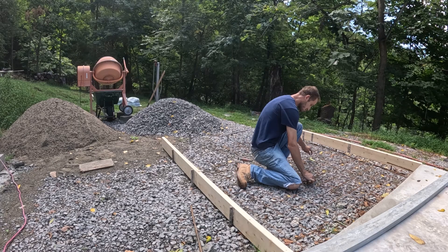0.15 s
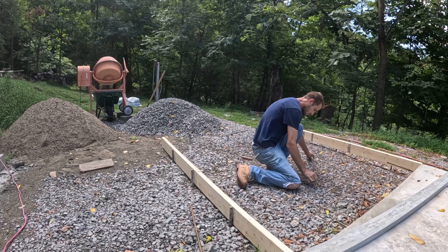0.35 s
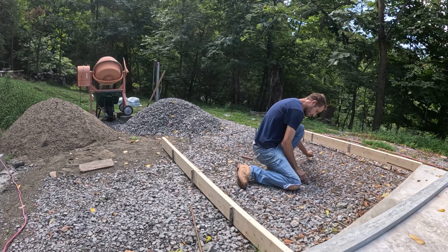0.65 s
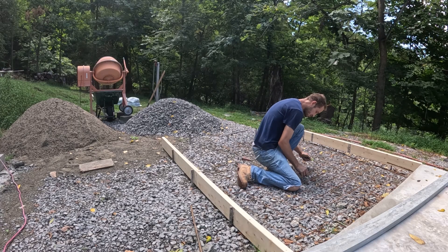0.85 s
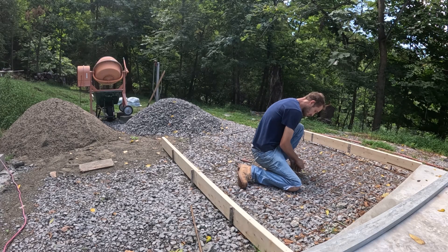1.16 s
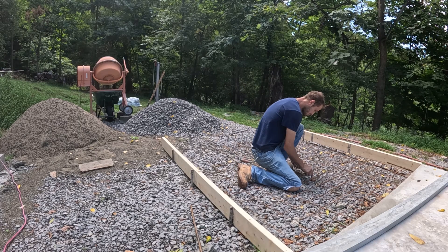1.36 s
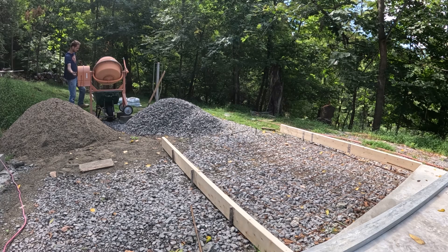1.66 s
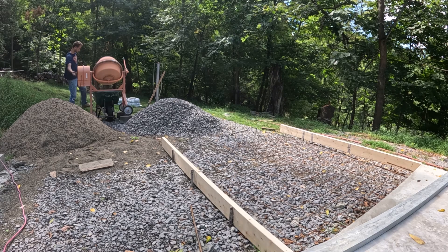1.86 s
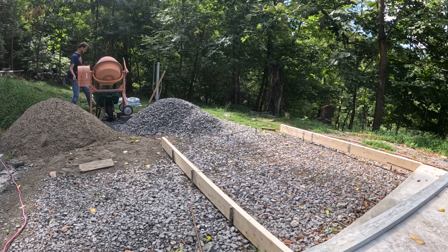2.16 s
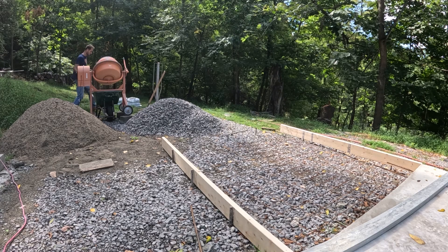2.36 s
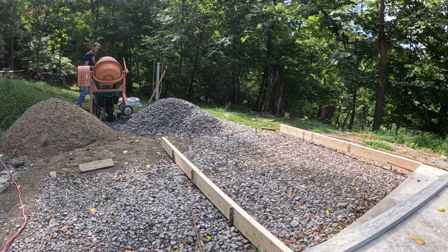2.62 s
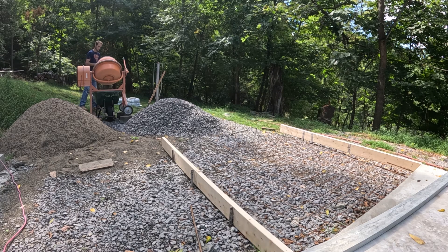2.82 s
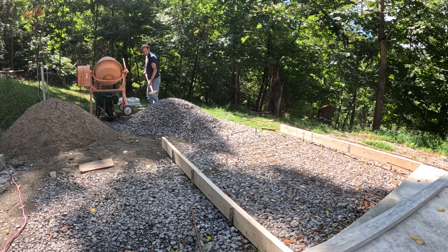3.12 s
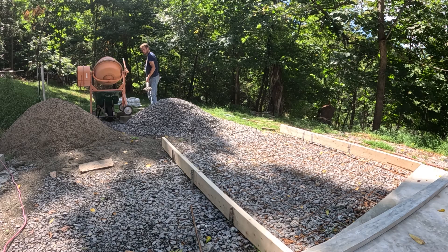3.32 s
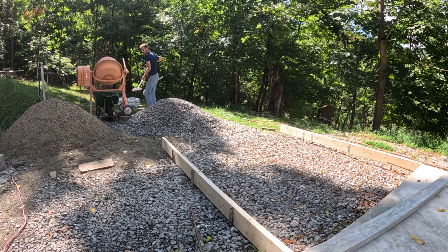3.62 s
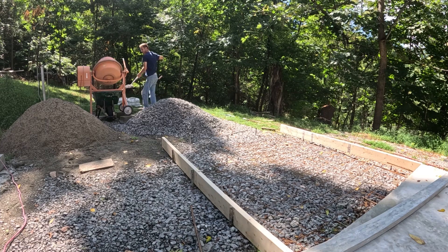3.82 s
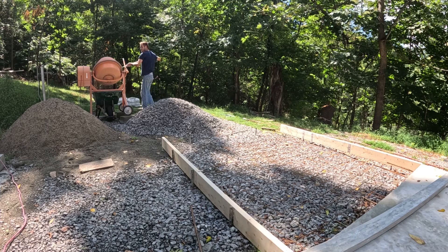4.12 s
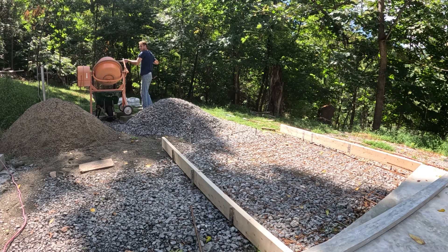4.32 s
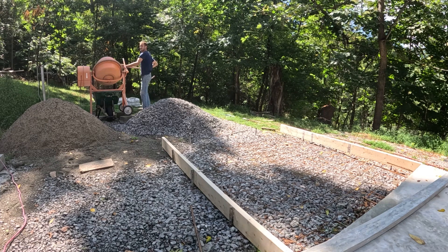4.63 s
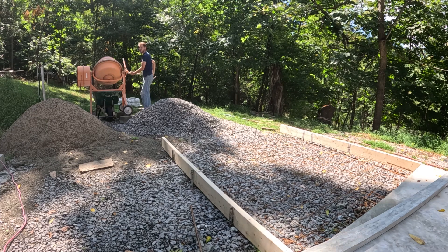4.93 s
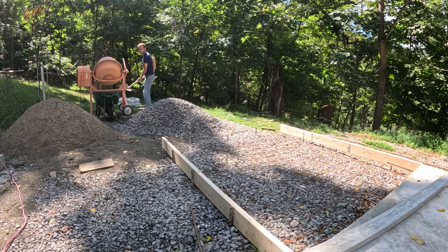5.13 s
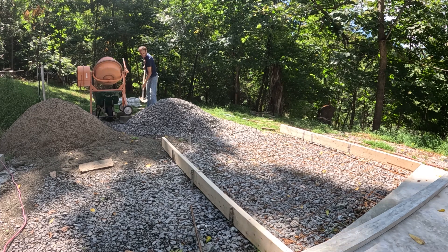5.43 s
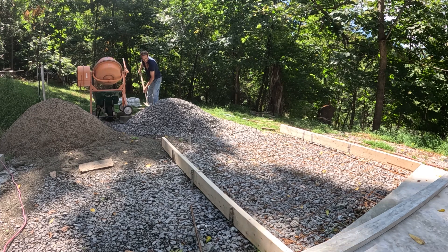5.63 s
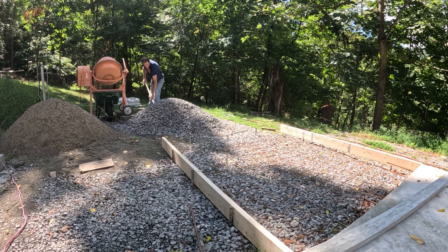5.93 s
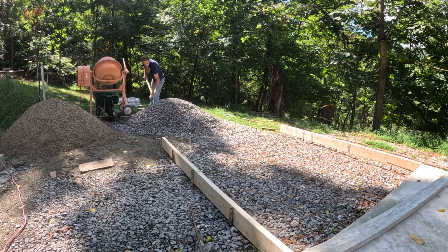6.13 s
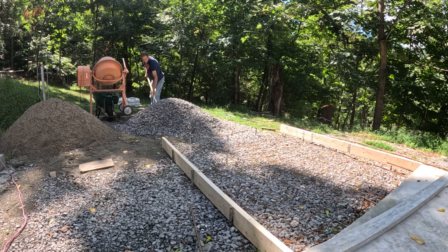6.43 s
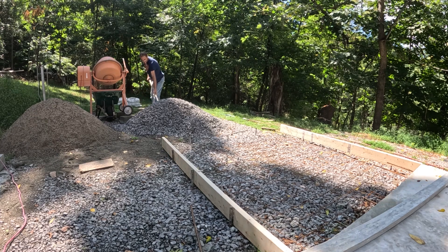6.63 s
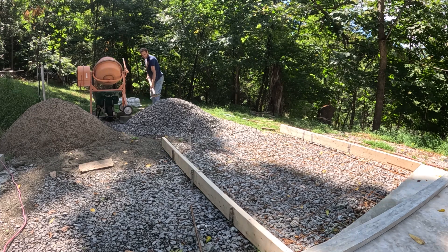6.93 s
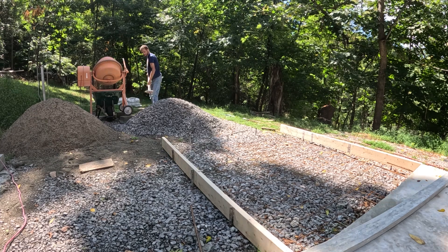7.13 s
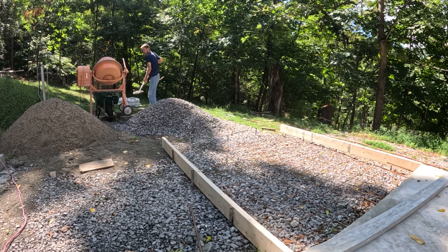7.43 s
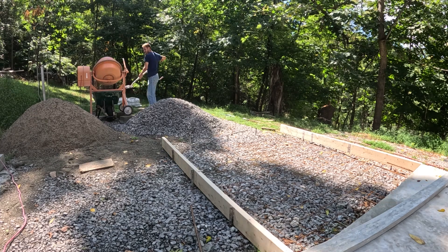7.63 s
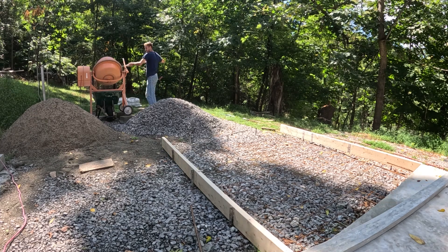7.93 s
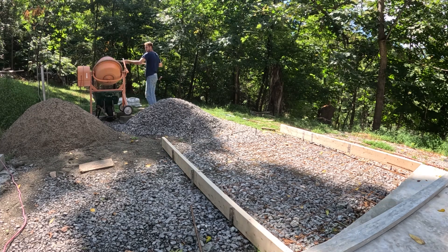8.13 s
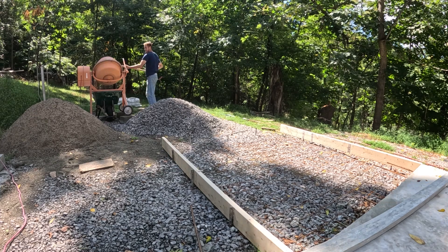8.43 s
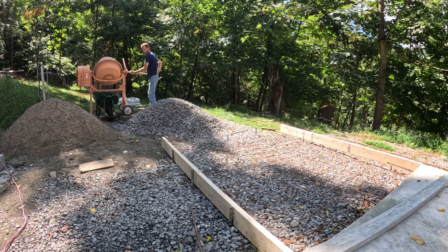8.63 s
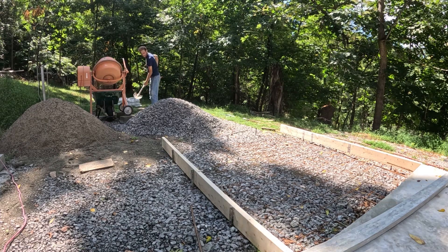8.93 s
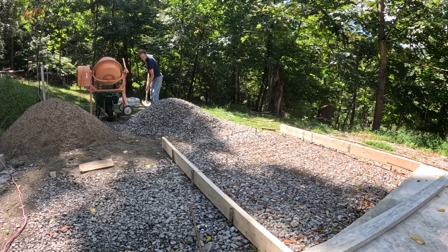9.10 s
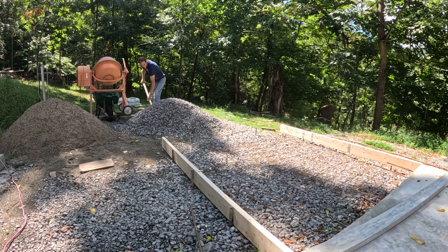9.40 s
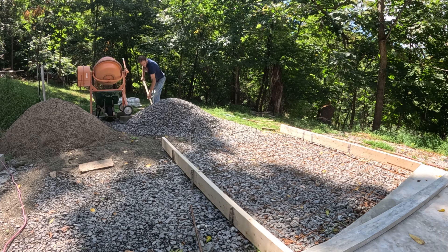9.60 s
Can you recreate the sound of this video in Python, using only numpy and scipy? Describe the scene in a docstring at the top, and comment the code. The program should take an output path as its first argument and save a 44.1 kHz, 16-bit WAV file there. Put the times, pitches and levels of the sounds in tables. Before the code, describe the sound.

A quiet open-air opening holds high insect chirping, a low distant engine and small gravel stirrings. After a soft pop the drone stops, and a motor-driven steel drum lurches into rotation, hollow, metallic and uneven, with knocks and clanks. A ringing shovel scrape throws in stones, and the rattle becomes a dense, harsh tumbling wash. More scrapes come late. A stationary stereo microphone hears it all some metres away, leaning a little left.

```python
"""Cement mixer by a wood

After a quiet start with a far engine and stirred stones, a steel drum booms and clatters beside trilling insects.
Modal synthesis: random impacts excite the decaying modes of drum, frame and blade.
The ring gear's teeth shake the drum, and it binds at the same places in every turn.
Gravel then tumbles as dense impacts while the shovel scrapes; insects and open air are tones and shaped noise."""
import sys
import numpy as np
from scipy import signal
from scipy.fft import rfft, irfft, next_fast_len
from scipy.io import wavfile
from scipy.ndimage import uniform_filter1d

SR = 44100
rng = np.random.default_rng(int(sys.argv[2]) if len(sys.argv) > 2 else 0)


def output_pcm(signal):
    """Save a mono or channel-first signal as 16-bit PCM at the path in sys.argv[1].

    Samples are clipped to [-1, 1] before scaling.
    """
    pcm = np.clip(np.atleast_2d(signal).T, -1, 1) * 32767
    wavfile.write(sys.argv[1], SR, np.round(pcm).astype(np.int16))


N = 430416
TIME = np.arange(N) / SR

# Table levels are relative: the functions add their own trims. Spectra give only the shape.

# start of the motor, arrival of the first gravel [s]
START_S, LOAD_S = 1.82, 4.78
# one turn of the drum, moment from which turns are counted [s]
TURN_S, FIRST_TURN_S = 1.71, 1.29
# gear: mean tooth rate [1/s], rms play [share of a tooth]
TEETH_PER_S, TOOTH_PLAY = 63.9, .045
# wall spots: largest detuning from spot to spot [share], rms favouring of modes [dB], spots passed [1/s]
DETUNE, SPOT_DB, SPOTS_PER_S = .012, 4.4, 11.7
# random wavering of the boom's pitch: rms [share of the pitch], rate [1/s]
WAVER, WAVER_PER_S = .023, 11
# between the binds: clatter of the empty and the loaded drum, boom, tumbling stones [dB]
EMPTY_DB, LOADED_DB, BOOM_DB, TUMBLE_DB = -50, -30.5, -35.5, -34.5
# uneven rolling of the stones: rms depth [dB], rate [1/s]
UNEVEN_DB, UNEVEN_PER_S = .5, 14
# rise and fade of the binds, then of the load's slides [s]
BIND_RISE_S, BIND_FADE_S = .014, .05
SLIDE_RISE_S, SLIDE_FADE_S = .035, .04
# rattle left by a knock: level against the knock [dB], fade [s]
AFTER_DB, AFTER_FADE_S = -8, .06
# dull grind of the bearings [dB]
GRIND_DB = -51.5
# rate of the katydid chirps [1/s]
CHIRPS_PER_S = 23.66
# upper limit of the band [Hz]
EDGE_HZ = 15250

# modes of the steel drum wall: (frequency [Hz], width [Hz], level over the plain clang [dB])
WALL = [(615.6, 16, 7), (809, 3.2, 10.5), (964.7, 9.9, 14), (993, 17, 11), (1106, 6.2, 10), (1200, 32, 7),
        (1430, 14.4, 7.5), (1840, 39, 1.5), (3220, 34, 2.5)]
# low modes of the whole drum on its frame: (frequency [Hz], width [Hz], level [dB])
BODY = [(60.5, 3.7, -24), (113.4, 5.8, -9), (160, 50, -13.5), (188, 9.5, 2.5), (234, 43, -9.5),
        (291.3, 8.5, -5), (378, 16, -9), (435, 10.3, -10.5)]
# modes of the frame at pitch factor 1: (frequency [Hz], width [Hz], level over the plain clang [dB])
FRAME = [(646, 7, 16), (964, 10, 18), (1055, 9, 20), (1700, 18, 11), (1800, 20, 17), (2550, 50, 8),
         (3300, 40, 3)]
# modes of the shovel blade at pitch factor 1: (frequency [Hz], width [Hz], level over the scrape [dB])
BLADE = [(930, 30, 10), (1220, 25, 9), (1950, 22, 22), (3000, 35, 9), (3610, 28, 13), (5830, 22, 17),
         (7700, 32, 11)]
# decay of a blow by 60 dB at length factor 1: (frequency [Hz], time [s])
RING = [(300, 0.83), (1100, 0.69), (2500, 0.44), (6000, 0.26), (12000, 0.18)]

# radiation of the boom by the drum: (frequency [Hz], gain [dB])
RADIATED = [(25, -29), (60, -18), (110, 2.5), (145, -0.5), (185, 2), (250, -1), (290, -6.5), (420, -3),
            (800, -9), (3000, -40)]
# spectrum of a plain steel clang: (frequency [Hz], level [dB])
CLANG = [(160, -30.5), (280, -1), (502, -10), (602, 0.5), (899, -4.5), (977, -3.5), (1580, -5), (1810, -4),
         (3290, -7.5), (5170, -15), (6200, -12), (15000, -50.5)]
# spectrum of a gear tooth slap: (frequency [Hz], level [dB])
TOOTH = [(300, -14.5), (600, -3), (1250, 4), (2400, 1.5), (4000, 1), (5100, -3.5), (6200, -2.5),
         (8000, -12.5), (10000, -15), (12000, -34), (15000, -57.5)]
# spectrum of falling stones: (frequency [Hz], level [dB])
STONES = [(300, -21), (700, -13.5), (1200, -22), (2000, -5.5), (2600, -6), (3800, -4), (5100, -6.5),
          (7000, -7.5), (8500, -14.5), (10000, -16.5), (12000, -29), (15000, -38)]
# spectrum of stones ticking at every tooth: (frequency [Hz], level [dB])
TICK = [(1500, -14), (3300, -4), (5100, -6), (6200, 0), (7200, -4), (10000, -11), (12000, -27), (15000, -45)]
# treble limit of the larger stones: (frequency [Hz], gain [dB])
PEBBLE_TREBLE = [(6500, 14), (10000, -29), (15000, -28)]
# spectrum of the load rolling on the wall: (frequency [Hz], level [dB])
ROLL = [(450, -21.5), (610, -7.5), (740, -46), (880, 2), (970, -14), (1250, 1.5), (1450, -1.5), (1650, -33),
        (2100, 4.5), (2800, -34), (6000, -40)]
# spectrum of the grinding bearings: (frequency [Hz], level [dB])
GRIND = [(300, -16), (600, -8.5), (780, 2.5), (1000, -21.5), (1600, -9), (3000, -27.5), (8000, -54)]
# spectrum of stones scraping the blade: (frequency [Hz], level [dB])
SCRAPE = [(130, -8), (500, -15), (1200, 0.5), (1580, -1.5), (1950, -1), (2350, -2.5), (3600, 2),
          (4900, -2.5), (7400, -1), (9400, -8), (15000, -29.5)]
# spectrum of stones stirred on the ground: (frequency [Hz], level [dB])
RUSTLE = [(400, -19), (1200, -4.0), (3000, 7.5), (6000, 7), (10000, -1), (14000, -48.5)]
# spectrum of the soft pop: (frequency [Hz], level [dB])
POP_SPECTRUM = [(100, 0), (300, -6), (800, -18), (2000, -28), (8000, -60)]
# spectrum of the far insect chorus: (frequency [Hz], level [dB])
CHORUS = [(3000, -37.5), (4000, -38), (4350, -25.5), (4750, -31.5), (5650, -26.5), (6050, -25.5),
          (6500, -14.5), (6700, -26), (7000, -10), (7250, -16.5), (7650, -15.5), (8300, -27.5), (9300, -38),
          (13000, -61)]
# spectrum of the open air: (frequency [Hz], level [dB])
RUMBLE = [(20, 3), (35, -32), (55, 4), (85, 2.5), (130, 0.5), (185, -1), (260, -12.5), (400, -17.5),
          (600, -40.5), (1200, -32.5), (3000, -38.5), (10000, -51), (15000, -49)]
# stereo lean: (frequency [Hz], left over right [dB])
LEAN = [(60, -0.7), (500, 1), (1200, 0.4), (2500, 1.7), (5000, 1.5), (9000, 4), (13000, 5)]
# diffuse path: (frequency [Hz], gain [dB])
SPREAD = [(30, -15), (90, -25), (180, -31), (350, -18.5), (700, -21.5), (1400, -16.5), (2800, -10.5),
          (6000, -10.5), (9500, -8.5), (13000, -3)]

# how hard the drum binds, one value for each turn [dB]
TURN_DB = [-17, 1, -22, 0.5, -3.5]
# places where the drum binds: (time into the turn [s], hold [s], clatter [dB], boom [dB])
BINDS = [(0.113, 0.18, -42.5, -61), (0.216, 0.16, -26.5, -29.5), (0.427, 0.05, -29.5, -38),
         (0.739, 0.046, -35, -39), (.92, .03, -40, -49), (1.432, 0.036, -38, -45)]
# the load slides down the wall: (time [s], hold [s], clatter [dB], stones [dB], boom [dB])
SLIDES = [(4.904, 0.081, -30, -29.5, -32), (5.084, 0.04, -31, -52, -34), (5.31, 0.032, -35, -57, -31),
          (6.025, 0.022, -43, -28.5, -48), (6.141, 0.17, -29, -32, -55), (6.456, 0.18, -28.5, -33, -36.5),
          (6.65, 0.055, -29, -47, -32), (6.943, 0.083, -26.5, -35.5, -32.5), (7.173, 0.15, -36, -39, -43),
          (7.61, 0.15, -38, -32, -36), (7.879, 0.039, -25, -43, -47), (7.985, 0.27, -28, -36, -47),
          (8.22, 0.18, -25, -34, -28.5), (9.55, 0.021, -26, -34, -29.5), (9.706, 0.039, -31, -31.5, -45)]
# the load rides up quietly: (middle [s], length [s], change in level [dB])
LULLS = [(5.24, 0.076, -4.5), (5.39, 0.13, -2), (7.115, .04, -5), (9.156, 0.1, -2.5)]
# knocks of drum and load: (time [s], level [dB], treble tilt [dB per decade], ring of the spot [Hz])
KNOCKS = [(1.814, -36, 17, 2480), (1.894, -35, -5, 1010), (1.94, -33.5, 4, 1280), (1.98, -31, -8, 866),
          (2.006, -28.5, -9, 1410), (2.045, -27.5, 11.5, 1300), (2.061, -24, 3.5, 1327),
          (2.074, -30, 1, 1250), (2.213, -41, -5, 1010), (2.228, -34, -15, 974), (2.355, -27.5, 4.5, 3180),
          (2.42, -31.5, 3, 1130), (2.795, -35.5, 0, 1794), (3.088, -34.5, 4, 1800), (3.104, -31, 9, 1820),
          (3.466, -30.5, 13, 3220), (3.68, -33.5, -9, 920), (3.749, -31.5, 7, 1290), (3.81, -27.5, 8, 1670),
          (3.858, -33.5, -3, 1870), (3.924, -32.5, -4, 1390), (4.095, -36.5, -2, 1445),
          (4.25, -32.5, -7, 1000), (4.62, -34, 4, 2110), (4.635, -28.5, 11, 3350), (5.336, -34, 11, 2280),
          (5.355, -28.5, 10, 1250), (5.479, -27, 5, 1320), (5.526, -30, 0, 1940), (5.634, -28.5, 2, 1240),
          (5.678, -28, 16, 4160), (5.795, -27.5, 10, 3160), (6.187, -28, 9, 1180), (6.5, -28, 22, 3230),
          (6.633, -25, 22, 2080), (6.682, -25, 11, 1470), (6.978, -28, 12, 950), (7.025, -26.5, 15, 840),
          (7.075, -26.5, 4, 956), (7.137, -33, 13, 1490), (7.166, -29, 7, 1050), (7.31, -30.5, -11, 1290),
          (7.901, -31, 5, 1160), (9.618, -26, 14, 1900)]
# the frame catches and clanks: (time [s], level [dB], length of the judder [s], pitch [factor])
CLANKS = [(2.796, -36, 0.012, 1.04), (4.296, -25, 0.055, 0.98), (6.02, -30, 0.066, 1.03),
          (7.704, -29, 0.07, 1.05), (8.03, -30.5, .11, 1.06), (9.43, -36, 0.07, .97)]
# dull thumps of the frame on its wheels: (time [s], level [dB], frequency [Hz])
THUMPS = [(1.895, -22, 111), (2.05, -18, 111), (2.095, -18, 98), (4.097, -24, 206), (4.476, -35, 189)]
# steady tones of the motor and belt drive: (frequency [Hz], level [dB])
MOTOR = [(119, -52), (238, -53), (360, -61), (743, -64), (1028, -66)]
# stones that run off the shovel: (time [s], hold [s], level [dB])
SPILLS = [(4.79, 0.034, -33), (5.86, 0.022, -31), (8.535, 0.031, -22.5), (9.41, 0.014, -23.5)]
# shovel strokes: (time [s], level [dB], rise [s], fade [s], ring of the blade [dB], pitch [factor])
STROKES = [(4.671, -16, 0.0022, .015, -6.5, 0.83), (4.69, -29, 0.014, 0.081, -20, 0.76),
           (4.763, -17, 0.011, 0.1, -2.5, 1.0), (5.858, -21.5, 0.0039, 0.097, -0.5, 0.89),
           (8.491, -24, 0.019, 0.061, -14, 0.55), (8.55, -22.5, 0.026, 0.065, -5, 0.65),
           (9.42, -21, 0.008, 0.065, -3.5, 0.86)]
# loose stones stirred by hand: (time [s], hold [s], level [dB])
STIRS = [(.29, .06, -61), (.69, 0.089, -56), (.78, 0.034, -46), (1.17, 0.11, -54.5)]
# partials of the far engine: (multiple of its speed, level [dB])
DRONE = [(2, -52), (3, -66), (4, -60), (5, -54), (6, -49), (7, -57.5), (8, -50), (9, -58)]
# run of the far engine: (time [s], speed [Hz], level [dB])
DRONE_RUN = [(0, 26.3, -0.5), (.55, 26.5, -9), (1.05, 26.17, -5.5), (1.25, 26.8, -1.5), (1.5, 26.7, 4),
             (1.54, 27, -40)]
# later low hum: (start [s], end [s], frequency [Hz], level [dB])
HUM = (2, 2.5, 101.5, -46.5)
# soft pop: (time [s], level [dB])
POP = (1.508, -45)
# pitch arch of a katydid chirp at pitch factor 1: (share of the chirp, frequency [Hz])
ARCH = [(0, 6720), (.25, 7040), (.5, 7130), (.75, 7000), (1, 6650)]
# katydids: (first chirp [s], end [s], chirp length [s], pitch [factor], level [dB])
KATYDIDS = [(.023, 1.5, .024, 1.0, -42), (1.51, 5.2, .024, 1.0, -42), (.0, .53, .03, .98, -45),
            (.046, 5.2, .022, .925, -53)]
# outdoor rumble: (time [s], level [dB])
OUTDOORS = [(0, -38), (.3, -41), (.5, -42), (1.05, -42), (1.22, -40), (1.49, -41), (1.53, -47),
            (9.76, -41.5)]


def amp(db):
    """Amplitude ratio of a level in dB."""
    return 10 ** (np.asarray(db) / 20)


def decibels(power):
    """Level in dB of a power."""
    return 10 * np.log10(power + 1e-12)


def unit(x):
    """Normalisation to an rms of 1."""
    return x / np.sqrt(np.mean(x ** 2) + 1e-20)


def read(points, hz):
    """Interpolation of a table over log frequency."""
    f, value = np.transpose(points)
    return np.interp(np.log(hz + 1), np.log(f + 1), value)


def curve(rows):
    """Linear interpolation of levels over time."""
    return np.interp(TIME, *np.transpose(rows))


def add(mix, s, sound):
    """Superposition: adds a sound to the mix at s seconds."""
    part = mix[:, max(round(s * SR), 0):][:, :sound.shape[1]]
    part += sound[:, :part.shape[1]]


def colour(x, points):
    """Linear filtering of a long sound by multiplication of its spectrum."""
    size = next_fast_len(N + 4096)
    gain = amp(read(points, np.fft.rfftfreq(size, 1 / SR)))
    return irfft(rfft(x, size) * gain, size)[..., :N]


def causal(points, size=1024):
    """Minimum phase: the most compact causal click with a given spectrum, from a Hilbert transform."""
    log_gain = np.log(amp(read(points, abs(np.fft.fftfreq(size, 1 / SR)))))
    return np.fft.ifft(np.exp(np.conj(signal.hilbert(log_gain)))).real[None]


def drift(per_s):
    """Slow random fluctuation of rms 1, interpolated between random knots."""
    knots = rng.standard_normal(2048)
    return unit(np.interp(TIME * per_s, np.arange(len(knots)), knots))


def swells(rows, rise, fade):
    """Power envelope of incoherent events (s, hold s, dB) that rise, hold and decay exponentially."""
    t = TIME[::64]
    power = 0
    for s, hold, db in rows:
        attack = np.clip((t - s) / rise, 0, 1)
        decay = np.exp(-np.maximum(t - s - hold, 0) / fade)
        power = power + (amp(db) * attack * decay) ** 2
    return np.interp(TIME, t, power)


def modes(table, t):
    """Damped resonance: decaying sines of random phase, for the direct and the diffuse path."""
    total = 0
    for hz, width, db in table:
        decay = 2 * np.pi * width / SR * np.exp(-np.pi * width * t)
        total = total + amp(db) * decay * np.cos(2 * np.pi * (hz * t + rng.random((2, 1))))
    return total


def blow(spectrum, table, length, crack, ring_db, size=11025):
    """Impulse response of unit energy: a crack, a dense clang whose treble dies first, clear modes."""
    hz, t, z = signal.stft(rng.standard_normal((2, size)), SR, nperseg=128)
    decay = np.exp(-np.log(1000) * t / (length * read(RING, hz)[:, None]))
    clang = signal.istft(z * decay, SR, nperseg=128)[1][:, :size]
    clang /= np.linalg.norm(clang[0])
    clang[0, 0] += crack
    clang += amp(ring_db) * modes(table, np.arange(size) / SR)
    sound = signal.fftconvolve(clang, causal(spectrum), axes=1)[:, :size]
    return sound / np.linalg.norm(sound[0])


def impacts(per_s, spread_db, size=N):
    """Poisson-like impacts of rms 1 and random sign, many small and a few large."""
    strength = rng.exponential(1, size)
    sign = rng.random(size, np.float32)
    hit = rng.random(size, np.float32) < per_s / SR
    clicks = np.zeros(size)
    clicks[hit] = amp(spread_db * np.minimum(strength[hit], 4)) * np.sign(sign[hit] - .5)
    return unit(clicks)


def strike(clicks, spectrum, table, length, crack, ring_db, count=6, scatter=1):
    """Position-dependent excitation: recurring spots tune and favour the modes differently."""
    spot = np.floor(TIME * SPOTS_PER_S + scatter * rng.random(N)) % count
    out = np.zeros((2, N))
    golden = np.arange(len(table)) * (np.sqrt(5) - 1) / 2  # spreads the favoured modes
    tunings = 1 + DETUNE * rng.permutation(np.linspace(-1, 1, count))
    for k, tuning in enumerate(tunings):
        favour_db = SPOT_DB * np.sqrt(2) * np.cos(2 * np.pi * (k / count + golden))
        own = [(hz * tuning, width, db + more - 0.5) for (hz, width, db), more in zip(table, favour_db)]
        sound = blow(spectrum, own, length, crack, ring_db)
        out += signal.oaconvolve((clicks * (spot == k))[None], sound, axes=1)[:, :N]
    return out


def binding(order):
    """Periodic friction: power of clatter (order 0) or boom (order 1) where each turn binds."""
    rows = []
    for turn, turn_db in enumerate(TURN_DB):
        for s, hold, *levels in BINDS:
            rows.append((FIRST_TURN_S + turn * TURN_S + s, hold, levels[order] + turn_db))
    return swells(rows, BIND_RISE_S, BIND_FADE_S)


def sliding(order):
    """Release of the load: power its slides give to clatter (order 0), stones (1) or boom (2)."""
    rows = [(s, hold, levels[order]) for s, hold, *levels in SLIDES]
    return swells(rows, SLIDE_RISE_S, SLIDE_FADE_S)


def lulls():
    """Reduced excitation: level change in dB while the load rides up the wall."""
    return sum(db * np.exp(-(2 * (TIME - s) / length) ** 2) for s, length, db in LULLS)


def shaking():
    """Addition of powers: clatter and boom levels in dB from running, binds and slides; knocks add clatter."""
    running = amp(np.where(TIME > LOAD_S, LOADED_DB, EMPTY_DB) + .8 * drift(16)) ** 2
    after = swells([(s, 0, db + AFTER_DB) for s, db, *_ in KNOCKS], rise=0.0056, fade=AFTER_FADE_S)
    start_up = np.clip((TIME - START_S) / 0.046, 0, 1) ** 2
    clatter_power = start_up * (running + binding(order=0) + sliding(order=0) + after)
    boom_power = start_up * (amp(BOOM_DB) ** 2 + binding(order=1) + sliding(order=2))
    return decibels(clatter_power) + lulls(), decibels(boom_power)


def gear(shake_db, teeth):
    """Gear-mesh excitation: each tooth slaps early or late, harder where the drum binds, softer when loaded."""
    tooth = np.floor(teeth + TOOTH_PLAY * drift(TEETH_PER_S))
    new_tooth = np.maximum(np.diff(tooth, prepend=tooth[0]), 0)
    slaps = unit(new_tooth * amp(2 * drift(64)))
    force = amp(-24.8 + 1.25 * (shake_db + 25) - 5.7 * (TIME > LOAD_S))
    return strike(slaps * force, TOOTH, WALL, length=.34, crack=.55, ring_db=3, count=6, scatter=6)


def clatter(shake_db):
    """Random impact excitation: the loose drum rattles on its bearings, less freely where tight or loaded."""
    tight_db = 0.23 * np.maximum(shake_db + 37.0, 0) * (TIME < LOAD_S)
    damping_db = 2.0 * (TIME > LOAD_S) + tight_db
    clicks = impacts(per_s=170, spread_db=4) * amp(shake_db - 2.5 - damping_db)
    return strike(clicks, CLANG, WALL, length=.6, crack=.15, ring_db=7, count=5)


def boom(boom_db):
    """Sustained resonance: jolts keep the drum's low modes swinging; their pitch wavers at random."""
    f = np.geomspace(20, 3000, 500)
    body_power = sum(amp(db) ** 2 / (1 + (2 * (f - hz) / width) ** 2) for hz, width, db in BODY)
    jolts = np.array([impacts(per_s=500, spread_db=1.5) for path in range(2)])
    swing = colour(jolts, list(zip(f, decibels(body_power) + read(RADIATED, f))))
    swing /= np.sqrt(uniform_filter1d(swing ** 2, SR // 4, axis=1) + 1e-12)  # even level
    warped = np.cumsum(1 + WAVER * drift(WAVER_PER_S)) % N  # reading position
    return unit(np.array([np.interp(warped, np.arange(N), path) for path in swing])) * amp(boom_db)


def knocks():
    """Local modal response: each hard knock rings with one clear mode and a few weak ones."""
    out = np.zeros((2, N))
    for s, db, bright_db, ring_hz in KNOCKS:
        spectrum = [(hz, level + bright_db * np.log10(hz / 1000)) for hz, level in CLANG]
        weak_hz = np.geomspace(1200, 3600, 3) * rng.uniform(.82, 1.2, 3)
        spot = [(ring_hz, 24, 17)] + [(hz, 30, 11) for hz in weak_hz]
        sound = blow(spectrum, spot, length=.52, crack=.42, ring_db=0)
        add(out, s, amp(db) * np.sqrt(.02 * SR) * sound)  # energy as of 20 ms at that level
    return out


def clanks():
    """Stick-slip: the frame judders, one ringing blow for each tooth that slips by."""
    out = np.zeros((2, N))
    spectrum = [(hz, level + 6.7 * np.log10(hz / 1000)) for hz, level in CLANG]
    for s, db, length, pitch in CLANKS:
        frame = [(hz * pitch, width, level) for hz, width, level in FRAME]
        for delay in np.arange(0, length, 1 / TEETH_PER_S):
            ring = blow(spectrum, frame, length=.7, crack=.25, ring_db=6)
            add(out, s + delay, amp(db) * np.sqrt(SR / TEETH_PER_S) * ring)
    return out


def thumps():
    """Strongly damped oscillation: the frame rocks on its wheels and lands with a short, low thump."""
    out, t = np.zeros((2, N)), TIME[:SR // 4]
    for s, db, hz in THUMPS:
        swing = np.sin(2 * np.pi * hz * t) * (1 - np.exp(-t / 0.0066)) * np.exp(-t / 0.014)
        add(out, s, amp(db + 1.0) * swing * np.ones((2, 1)))
    return out


def motor():
    """Phase modulation: motor hum and belt whine; the higher a tone, the more it wavers."""
    slip = drift(16)
    tones = 0
    for hz, db in MOTOR:
        cycles = hz * TIME + hz / 2500 * slip + .12 * drift(25)
        tones = tones + amp(db + 3.5 * drift(11)) * np.sin(2 * np.pi * cycles)
    return tones * (TIME > START_S)


def bearings():
    """Friction noise: dense fine impacts make the soft grind of the bearings."""
    grit = np.array([impacts(per_s=1400, spread_db=1.5) for path in range(2)])
    return unit(colour(grit, GRIND)) * amp(GRIND_DB + 1.0 * drift(46)) * (TIME > START_S)


def tumbling():
    """Addition of powers: stone level in dB from uneven rolling, binds, slides and spills."""
    rolling_power = amp(TUMBLE_DB + UNEVEN_DB * drift(UNEVEN_PER_S)) ** 2
    bind_power = amp(-7.5) ** 2 * binding(order=0)
    spill_power = swells(SPILLS, rise=0.013, fade=0.058)
    power = rolling_power + bind_power + sliding(order=1) + spill_power
    return decibels((TIME > LOAD_S) * power) + lulls()


def rolling(shake_db):
    """Rolling excitation: in the loaded drum stones wake now one mode of the wall, now another."""
    loaded = np.clip((TIME - LOAD_S) / 0.64, 0, 1) ** 0.057
    clicks = impacts(per_s=240, spread_db=3) * loaded * amp(-35.0 + 1.3 * (shake_db + 26.5))
    return strike(clicks, ROLL, WALL, length=0.35, crack=0.083, ring_db=-2.0, count=5)


def gravel(tumble_db, teeth):
    """Granular collisions: stones fall on each other and the wall, and tick as every tooth makes them jump."""
    clumps = impacts(per_s=260, spread_db=2.6)
    jumps = unit(impacts(per_s=16000, spread_db=0) * np.exp(-(teeth % 1) / .06))
    level = amp(tumble_db)
    falling = strike(clumps * level * amp(-.8), STONES, WALL, length=.5, crack=.55, ring_db=-2, count=5)
    ticking = strike(jumps * level * amp(-8), TICK, [], length=.22, crack=1.2, ring_db=0, count=1)
    return falling + ticking


def pebbles(tumble_db, count=32):
    """Modes of solid bodies: larger stones stand out of the wash, each with its own short clack."""
    t, out = TIME[:2200], np.zeros((2, N))
    for hz in np.geomspace(1000, 4800, count) * rng.uniform(.95, 1.05, count):
        clack = modes([(hz, 55, 2), (1.71 * hz, 200, -3), (3.12 * hz, 700, -7)], t)
        clack /= np.linalg.norm(clack[0])
        for s, strength in zip(rng.uniform(0, N / SR, 28), rng.exponential(1, 28)):
            add(out, s, clack * amp(6.0 * min(strength, 2) - 2 * np.log2(hz / 1000)))
    return unit(colour(out, PEBBLE_TREBLE)) * amp(tumble_db - 3.3)


def shovel():
    """Scraping excitation: the blade rings as a bright rush of stones grates over it; buried, it rings less."""
    out, t = np.zeros((2, N)), TIME[:SR // 2]
    for s, db, rise, fade, ring_db, pitch in STROKES:
        blade = [(hz * pitch, width, level) for hz, width, level in BLADE]
        force = np.minimum(t / rise, 1) * np.exp(-np.maximum(t - rise, 0) / fade)
        for spot in range(4):
            rush = impacts(per_s=900, spread_db=1.5, size=len(t)) * force / 2
            scrape = blow(SCRAPE, blade, length=.2, crack=1.1, ring_db=-11)
            add(out, s, amp(db) * signal.fftconvolve(rush[None], scrape, axes=1))
        ring = blow(SCRAPE, blade, length=.7, crack=0, ring_db=14)
        add(out, s, amp(db + ring_db) * np.sqrt(.014 * SR) * ring)  # energy as of 14 ms
    return out


def stirring():
    """Granular friction: a hand shifts stones on the ground with a faint rustle and short sweeps."""
    rustle_power = swells([(0.01, 1.3, -64.5)], rise=0.0078, fade=0.0087)
    level = np.sqrt(rustle_power + swells(STIRS, rise=0.027, fade=0.023))
    clicks = impacts(per_s=1700, spread_db=5.5) * level
    return strike(clicks, RUSTLE, [], length=0.082, crack=0.24, ring_db=0, count=2)


def drone():
    """Harmonic series: a far engine sounds on multiples of its speed; a low hum comes later."""
    times, speeds, levels = np.transpose(DRONE_RUN)
    turns = np.cumsum(np.interp(TIME, times, speeds)) / SR
    run_db = np.interp(TIME, times, levels)
    engine = 0
    for multiple, level in DRONE:
        tone = np.sin(2 * np.pi * (multiple * turns + rng.random()))
        engine = engine + amp(run_db + level + 1.5 * drift(6)) * tone
    start, end, hum_hz, hum_db = HUM
    gate = np.clip(np.minimum(TIME - start, end - TIME) / 0.024, 0, 1)
    hum = amp(hum_db) * gate * np.sin(2 * np.pi * hum_hz * TIME)
    return np.sqrt(2) * (engine + hum)


def pop():
    """Impulse response without clear modes: a soft, dull pop at 1.5 s."""
    out = np.zeros((2, N))
    s, db = POP
    sound = blow(POP_SPECTRUM, [], length=.1, crack=2, ring_db=0)
    add(out, s, amp(db) * np.sqrt(.01 * SR) * sound)  # energy as of 10 ms
    return out


def insects():
    """Frequency and amplitude modulation: near katydids chirp in arches of pitch over a far, blurred chorus."""
    chop_db = 2.2 * drift(75)
    out = amp(-51.0 + chop_db) * unit(colour(rng.standard_normal((2, N)), CHORUS))
    for start, end, length, pitch, db in KATYDIDS:
        cycle = (TIME - start + 0.00084 * drift(3.1)) * CHIRPS_PER_S % 1
        share = np.clip(cycle / (CHIRPS_PER_S * length), 0, 1)  # progress through the chirp
        hz = pitch * np.interp(share, *np.transpose(ARCH)) + 35 * drift(190)
        active = (TIME > start) * (TIME < end)
        stroke = np.sin(np.pi * share) * active * amp(db - 0.5 + 0.44 * drift(25.8))
        out[0] += stroke * np.sin(2 * np.pi * np.cumsum(hz) / SR)
    return out


def outdoors():
    """Filtered noise: the low, lumpy rumble of the open air."""
    lumps_db = 1.2 * drift(12)
    return unit(colour(rng.standard_normal((2, N)), RUMBLE)) * amp(curve(OUTDOORS) + lumps_db)


def scene():
    """Superposition of direct and diffuse paths, with level differences placing the sound a little left."""
    shake_db, boom_db = shaking()
    tumble_db = tumbling()
    teeth = TEETH_PER_S * TIME - 1 / 3 + .04 * drift(3)
    mixer = gear(shake_db, teeth) + clatter(shake_db) + boom(boom_db) + knocks() + clanks()
    mixer += thumps() + motor() + bearings()
    load = rolling(shake_db) + gravel(tumble_db, teeth) + pebbles(tumble_db)
    background = drone() + pop() + insects() + outdoors()
    direct, diffuse = mixer + load + shovel() + stirring() + background
    diffuse = colour(diffuse, SPREAD)
    channels = []
    for side in (1, -1):  # left, right
        lean = [(hz, side * db / 2) for hz, db in LEAN]
        channels.append(colour(direct + side * diffuse, lean))
    return np.array(channels)


def record(dry):
    """Soft saturation rounds off the highest peaks, then a linear-phase low-pass limits the band."""
    rounded = dry / (1 + (dry / .5) ** 4) ** .25
    low_pass = signal.firwin(401, EDGE_HZ, window=("kaiser", 9), fs=SR)
    return signal.oaconvolve(rounded, low_pass[None], "same")


dry = scene()
out = record(dry)
output_pcm(out)
```